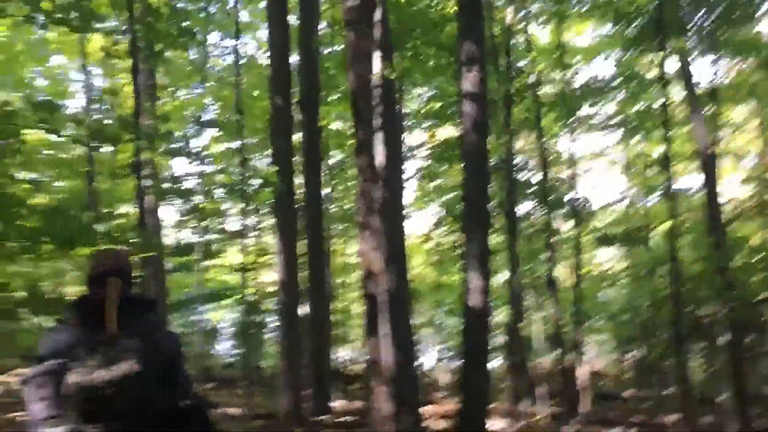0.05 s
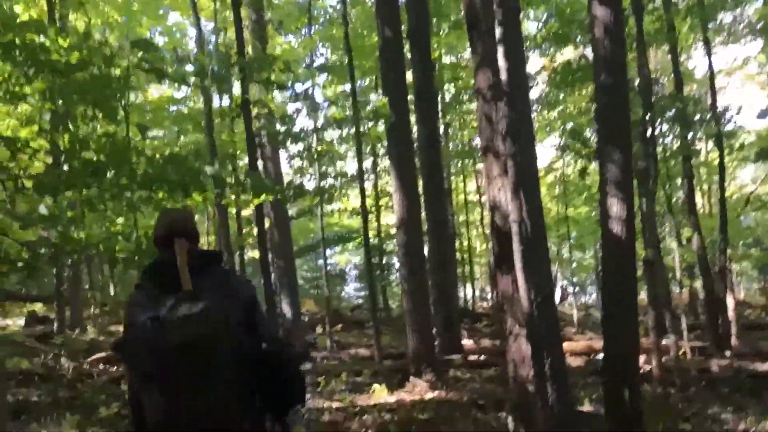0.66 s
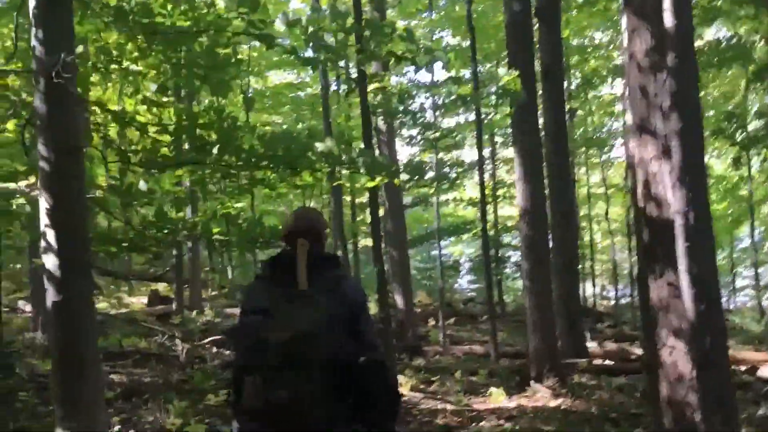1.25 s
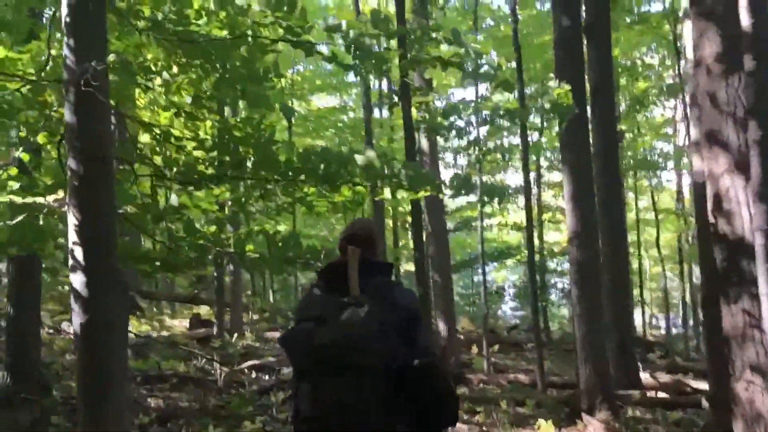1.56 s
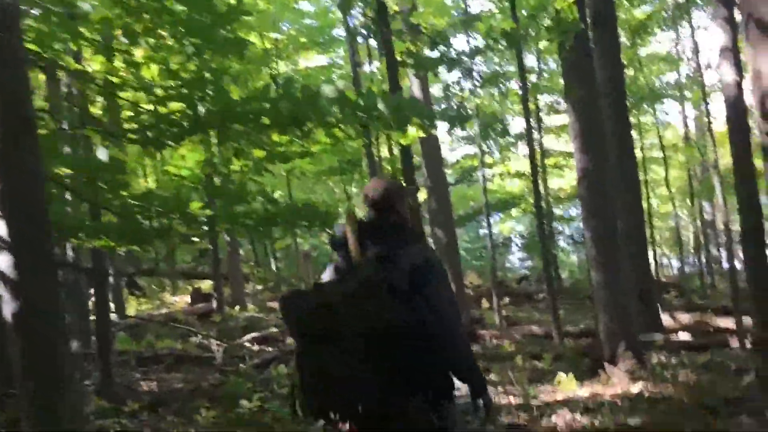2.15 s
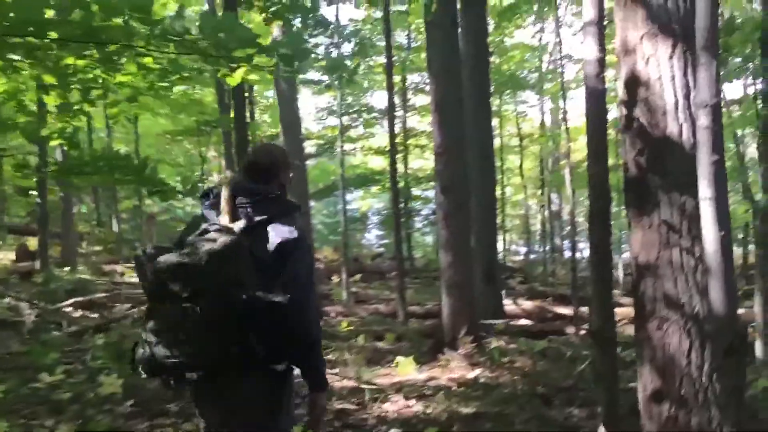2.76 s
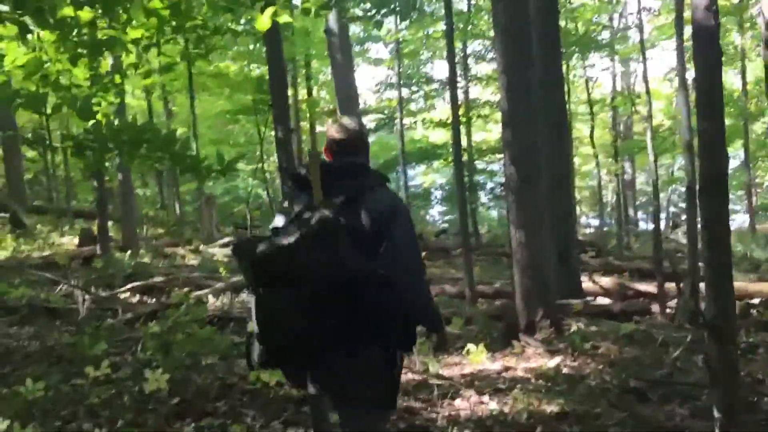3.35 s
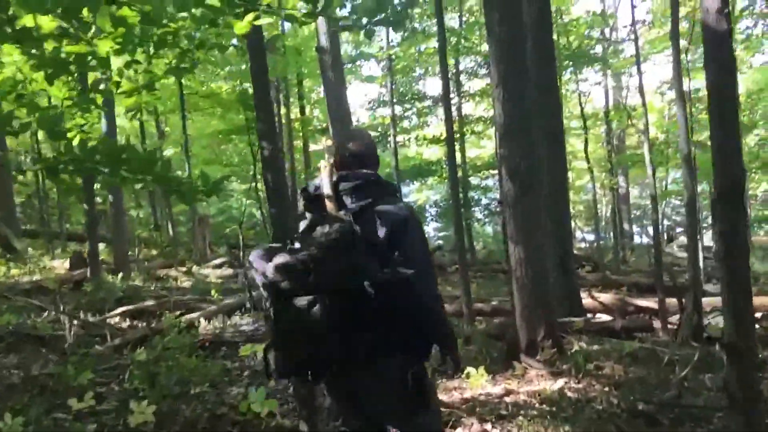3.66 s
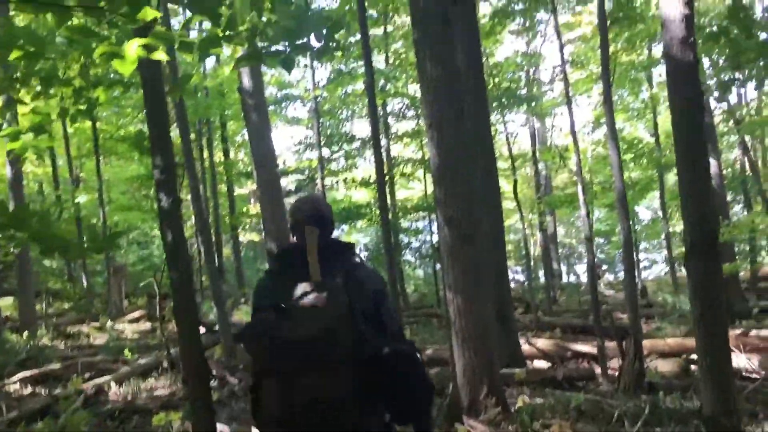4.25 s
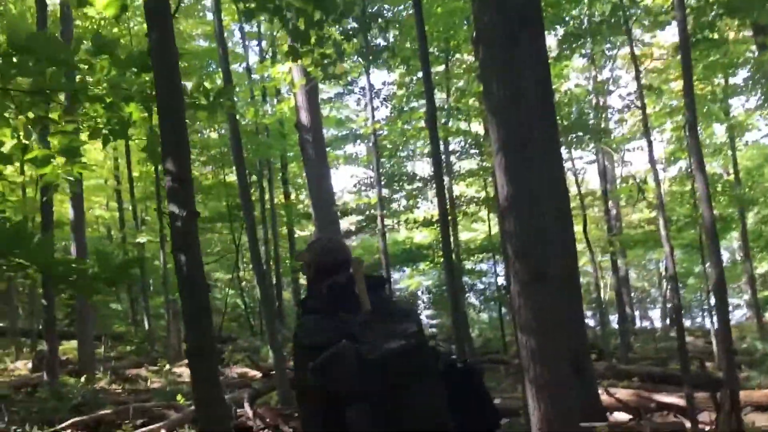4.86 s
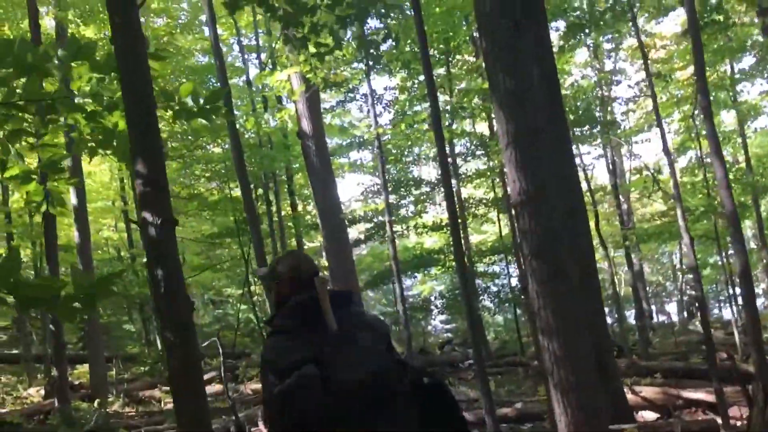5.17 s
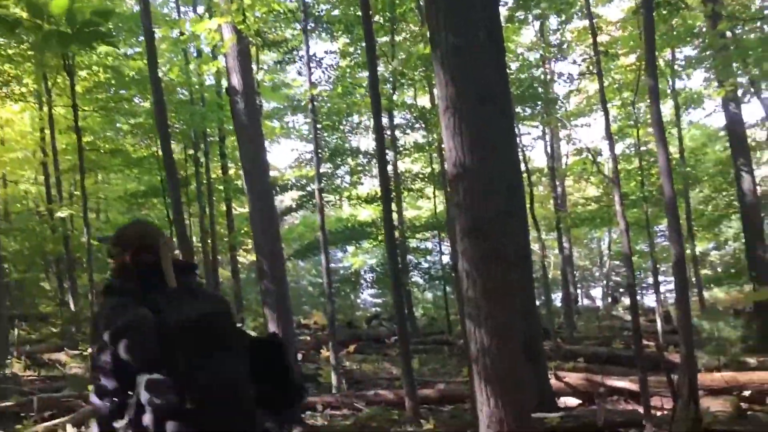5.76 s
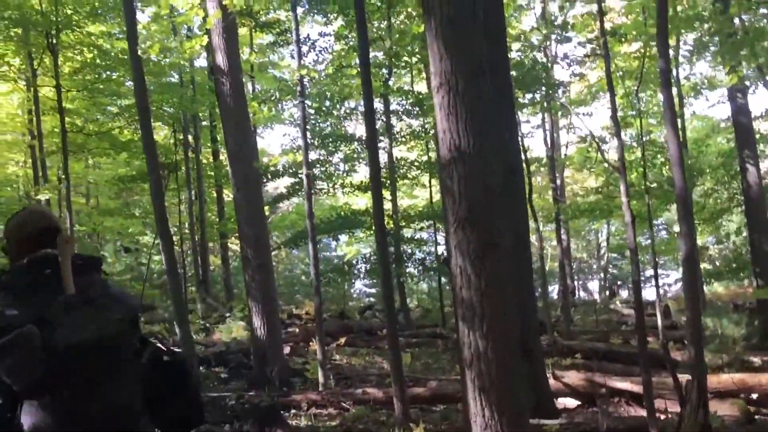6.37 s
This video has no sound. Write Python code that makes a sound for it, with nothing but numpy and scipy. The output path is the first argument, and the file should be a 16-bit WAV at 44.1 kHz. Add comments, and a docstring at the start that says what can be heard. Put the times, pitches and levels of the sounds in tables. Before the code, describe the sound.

Close footsteps crush brittle leaves on soft forest ground at a steady but slightly uneven walking pace. Small twigs tick and break under the boots, and thicker sticks give sharp cracks with a hollow knock. An early snap stands out, a louder run of snaps comes past the middle, and a few more land with heavy steps near the end. Underneath lies only a faint hush of woodland air.

```python
"""Dry leaf litter crunches under the boots of hikers walking through a wood.
Each step crushes a crowd of brittle leaves, whose tiny breaks ring as a crackle, and presses the
soft soil into a dull thump. Twigs snap underfoot with a crack, a tick, a knock and a thud.
The ground and the trunks scatter each snap into a short, thin tail. A faint hush lies beneath."""
import sys
import numpy as np
from scipy import signal
from scipy.fft import rfft, irfft
from scipy.io import wavfile
from scipy.ndimage import uniform_filter1d

SR = 44100
rng = np.random.default_rng(int(sys.argv[2]) if len(sys.argv) > 2 else 0)


def materialize(psi):
    """Save the field psi as 16-bit PCM at rate SR to the path in sys.argv[1].

    A 1-D psi becomes a single channel; in a 2-D psi each row is a channel.
    """
    bounded = np.clip(np.atleast_2d(psi).T, -1, 1)
    quanta = np.round(bounded * 32767).astype(np.int16)
    wavfile.write(sys.argv[1], SR, quanta)


N = 282840
THUD_HZ = 274.62  # usual pitch of a twig's recoil into the soil


def leaves(crush_db, crisp_db, body_db=0.5, packed_db=-7.5, slide_db=5, swish_db=-1, stalk_db=-5):
    """Leaves break and slide under the boots; a harder crush breaks more, and now and then a stalk."""
    # body of the crunch (frequency [Hz], level [dB])
    body_spectrum = [(700, -17.5), (1300, -4.5), (2200, 1.5), (3000, 0), (4200, -1), (5600, -1), (7000, -7),
                     (9500, -36.5)]
    # sizzle of the crisp edges (frequency [Hz], level [dB])
    crisp_spectrum = [(4500, -14), (7000, -9.5), (8200, -2.5), (9400, -2), (10400, -7.5), (12500, -3.5),
                      (15600, -6.5)]
    # low mids of packed leaves (frequency [Hz], level [dB])
    packed_spectrum = [(220, -7.5), (420, -6), (700, -2), (1100, 1.5), (1500, -4.5), (2400, -21.5)]
    busy = amp(.5 * (crush_db + 47))  # scales the break rates: 1 at a crush of -47 dB
    clicks = fractures(11000 * busy, spread_db=1, clump_db=3, clump_s=.006)
    bursts = amp(stalk_db) * stalks(35 * busy)
    rings = leaf_rings(clicks)
    slide = amp(slide_db) * rng.standard_normal(N)
    crackle = shifting_leaves(rings + slide + bursts)
    swish = amp(swish_db) * rng.standard_normal(N)  # thin edges brushing past each other
    body = amp(crush_db + body_db) * steady(colour(crackle, body_spectrum))
    edges = amp(crisp_db) * steady(colour(crackle + swish, crisp_spectrum))
    packed = amp(crush_db + packed_db) * steady(colour(crackle, packed_spectrum))
    return body + edges + packed


def boot_strokes(hold_s=0.018555, stir_db=-65.5, stir_crisp_db=-8):
    """Envelopes in dB of the crush and its crisp edges; loose litter keeps stirring between steps."""
    # a boot landing on the leaves or sweeping through them
    # (start [s], rise [s], time to fade by 20 dB [s], crush [dB], edges relative to crush [dB])
    strokes = [(0.0, 0.001667, 0.2549, -43, -4.5), (0.108, 0.02083, 0.2185, -48, -10.5),
               (0.18, 0.06423, 0.2512, -53.5, -12.5), (0.575, .055, 0.6731, -50, 0),
               (0.68, 0.15104, 0.3495, -42.5, -13.5), (0.839, 0.14533, 0.0961, -36.5, -5.5),
               (1.06, 0.1751, 0.3989, -57, -13), (1.27, 0.01961, 0.4784, -52, 1.5),
               (1.33, 0.1219, 1.0481, -48.5, -4.5), (1.45, 0.08417, 0.4016, -43.5, -2),
               (1.709, 0.07805, 0.1576, -41, -4.5), (1.999, 0.03985, 0.1838, -48, -2),
               (2.13, 0.02654, 0.2031, -53.5, -3), (2.2, 0.12049, 0.0019, -46.5, -4.5),
               (2.339, 0.0118, 0.256, -36.5, -3.5), (2.607, 0.03405, 0.1042, -44.5, -0.5),
               (2.68, 0.08343, 0.2774, -43, -1.5), (2.901, 0.05456, 0.0006, -47, -1.5),
               (3.08, 0.03366, 0.58, -51, -7.5), (3.14, 0.07602, 0.2966, -43, -4.5),
               (3.42, 0.01942, 0.2009, -43.5, -1), (3.53, 0.06092, 0.5954, -51, -2),
               (3.719, 0.0325, 0.2116, -39, -5.5), (3.82, 0.03338, 0.2084, -39, -3),
               (4.25, 0.01483, 2.0967, -56.5, -3), (4.329, 0.02464, 0.822, -44, -2.5),
               (4.48, 0.02542, 0.3392, -43.5, -2), (4.65, 0.0891, 0.1769, -43, -3.5),
               (4.92, 0.01298, 0.1764, -47, -3), (5.002, 0.05133, 0.331, -41.5, -2.5),
               (5.185, 0.01558, 0.2139, -44, 2.5), (5.28, 0.05705, 0.3238, -42, -4),
               (5.519, 0.04508, 0.1116, -45.5, -0.5), (5.63, 0.1603, 0.1219, -43.5, -1.5),
               (5.79, 0.10823, 0.216, -35.5, -4), (6.06, 0.01674, 0.0854, -39, -4)]
    crush = np.full(N, amp(stir_db) ** 2)
    crisp = np.full(N, amp(stir_db + stir_crisp_db) ** 2)
    for start, rise_s, fade_s, crush_db, crisp_db in strokes:
        power = amp(crush_db) ** 2 * press(rise_s, hold_s, fade_s)
        add(crush, start, power)
        add(crisp, start, amp(crisp_db) ** 2 * power)
    return 10 * np.log10(crush), 10 * np.log10(crisp)


def press(rise_s, hold_s, fade_s, curve=1.1615):
    """Power of one push of a boot: it builds, holds, then dies away by 20 dB in each fade_s."""
    t = np.arange(0, rise_s + hold_s + 2 * fade_s, 1 / SR)
    attack = np.sin(np.pi / 2 * np.minimum(t / rise_s, 1)) ** curve
    release = amp(-20 * np.maximum(t - rise_s - hold_s, 0) / fade_s)
    return (attack * release) ** 2


def fractures(per_s, spread_db, clump_db, clump_s):
    """Tiny breaks of random sign: many small, a few larger, swelling in clumps as something gives way."""
    size = amp(spread_db * np.minimum(rng.exponential(1, N), 4)) * rng.choice([-1, 1], N)
    knots = np.arange(0, N, max(clump_s * SR, 20))
    clumps = np.interp(np.arange(N), knots, rng.standard_normal(N)[:len(knots)])
    breaks = rng.random(N) < per_s / SR
    return evened(size * breaks * amp(clump_db * np.clip(clumps, -2, 2)))


def leaf_rings(clicks, width_hz=282.44, count=48):
    """Each break briefly rings one of many leaves, each at its own pitch; large, low ones ring louder."""
    leaf = rng.integers(0, count, N // 8 + 1).repeat(8)[:N]
    pitches = np.linspace(np.sqrt(500), np.sqrt(15700), count) ** 2
    widths = width_hz * np.sqrt(pitches / pitches.mean())
    gains = 1 / np.hypot(1, pitches / 2600)
    rings = (gains[k] * ring(clicks * (leaf == k), hz, hz / widths[k]) for k, hz in enumerate(pitches))
    return evened(sum(rings))


def stalks(per_s, decay_s=0.000478):
    """Each breaking stalk spits a short burst of noise."""
    breaks = fractures(per_s, spread_db=-1, clump_db=-5, clump_s=0.048)
    power = signal.lfilter([1], [1, -np.exp(-1 / (decay_s * SR))], breaks ** 2 + 1e-20)
    return evened(np.sqrt(power) * rng.standard_normal(N))


def shifting_leaves(x, depth_db=2, patch_s=.07, patch_hz=260, size=512):
    """The boot meets ever different leaves, so their resonances come and go."""
    spectra = signal.stft(x, nperseg=size)[2]
    patches = uniform_filter1d(rng.standard_normal(spectra.shape), round(patch_hz * size / SR), axis=0)
    patches = uniform_filter1d(patches, round(patch_s * SR / size), axis=1)
    return signal.istft(spectra * amp(depth_db * evened(patches)), nperseg=size)[1][:N]


def twigs(usual_thud_db=-33.5, db_per_octave=31.5):
    """The featured snaps, each with its own echoes; a harder recoil moves more soil and thuds lower."""
    # breaking twigs (time [s], crack [dB], wood pitch [Hz], splinter tick [dB], knock [dB], thud [dB])
    snaps = [(0.0116, -37.5, 1910, -53.5, -34, -42.5), (0.0207, -33, 1718, -50.5, -26.5, -38.5),
             (0.2307, -48, 2198, -66, -42, -62.5), (0.7738, -33.5, 2206, -52, -39.5, -44),
             (0.786, -34.5, 2601, -38.5, -35.5, -36.5), (0.8063, -15, 2388, -26, -23, -25.5),
             (0.8196, -22.5, 2635, -29.5, -53, -36), (0.8656, -27, 2727, -35, -29, -43.5),
             (0.8739, -32.5, 2211, -34.5, -36.5, -34.5), (0.99, -40, 3003, -36, -49, -46),
             (1.3854, -43, 3053, -42.5, -49, -49), (1.572, -22.5, 4475, -36.5, -50.5, -31.5),
             (1.777, -58, 2900, -57, -36.5, -35.5), (2.396, -28.5, 3652, -24, -44, -29.5),
             (2.654, -37, 2546, -55, -67, -50.5), (2.797, -28, 3300, -34.5, -48, -32),
             (2.8758, -33.5, 4313, -34.5, -60, -41.5), (3.3386, -39, 2375, -43.5, -53.5, -70.5),
             (3.4396, -30.5, 3587, -30.5, -47.5, -38), (3.7259, -38.5, 4256, -40, -48, -57),
             (3.7628, -30, 2668, -36.5, -38, -41.5), (3.766, -29, 2804, -37, -29, -37.5),
             (3.838, -31, 3196, -29, -37.5, -37.5), (3.985, -42, 2415, -54, -38, -55),
             (4.0663, -34.5, 6131, -32.5, -78.5, -57.5), (4.1389, -48.5, 4212, -44, -58, -66),
             (4.3469, -9.5, 5100, -19.5, -25, -18), (4.3553, -21.5, 3586, -40, -44.5, -28.5),
             (4.3873, -33, 4486, -36, -49.5, -47.5), (4.483, -18, 2586, -18.5, -20, -37),
             (4.4899, -25, 3956, -23.5, -44, -46), (4.5018, -23, 4652, -16.5, -42.5, -40.5),
             (4.5083, -15, 4800, -18.5, -24.5, -39.5), (4.6783, -26, 3672, -30.5, -34.5, -28),
             (4.7063, -31, 3643, -32, -38, -33), (4.7309, -35.5, 3606, -35.5, -37, -38.5),
             (4.7641, -29.5, 2133, -40, -26.5, -33), (4.931, -26.5, 5741, -24, -48.5, -46.5),
             (5.3266, -43.5, 3600, -36.5, -45.5, -50.5), (5.8279, -30.5, 2505, -34.5, -33.5, -39.5),
             (5.887, -27.5, 3286, -29, -25, -60.5), (5.891, -21, 5265, -34, -27.5, -56.5),
             (5.9143, -29, 2812, -25, -34, -49.5), (6.0702, -18.5, 2500, -20, -26.5, -35),
             (6.0791, -26.5, 2800, -30.5, -54.5, -37), (6.1877, -27.5, 1817, -34.5, -32.5, -46.5),
             (6.2706, -45.5, 3006, -69.5, -64, -72.5), (6.3116, -36, 2942, -36.5, -39.5, -50)]
    out = np.zeros(N)
    for s, crack_db, wood_hz, tick_db, knock_db, thud_db in snaps:
        thud_hz = THUD_HZ * 2 ** ((usual_thud_db - thud_db) / db_per_octave)
        snap = twig(crack_db, wood_hz, tick_db, knock_db, thud_db, thud_hz)
        add(out, s - .0003, scatter(snap, near_db=-6, far_db=-13.5))
    return out


def twig(crack_db, wood_hz, tick_db, knock_db, thud_db, thud_hz, ring_db=-2, blow_s=.003, size=1200):
    """Fibres tear in about a millisecond; the stick rings, and its recoil thumps the soil."""
    # crack of the wood (frequency [multiple of wood pitch], level [dB])
    crack_spectrum = [(.28, -19), (.5, -3.5), (.85, -3), (1.25, -6), (1.7, -9), (2.6, -17)]
    # bright tick of a splinter (frequency [Hz], level [dB])
    tick_spectrum = [(4500, -26), (6800, -2), (9200, 2.5), (10500, -3.5), (13000, -1.5), (15800, -3)]
    # hollow knock of the stick (frequency [Hz], level [dB])
    knock_spectrum = [(200, -17), (420, -5.5), (650, 0.5), (950, 0.5), (1300, -0.5), (1700, -4),
                      (3000, -36.5)]
    t = np.arange(size) / SR
    fibres = rfft(rng.standard_normal(size) * (1 - np.exp(-t / .0001)) * np.exp(-t / .0011))
    tear = irfft(fibres / np.cbrt(abs(fibres))) * np.exp(-t / .006)  # excites all pitches nearly alike
    crack = colour(tear, [(multiple * wood_hz, db) for multiple, db in crack_spectrum])
    crack = crack + amp(ring_db) * ring(crack, wood_hz, q=4.325)
    tick = colour(tear, tick_spectrum)
    knock = colour(tear, knock_spectrum)
    thud = ring(ring(signal.unit_impulse(size), thud_hz, q=2.0585), thud_hz, q=1)
    parts = [(crack_db, crack), (tick_db, tick), (knock_db, knock), (thud_db, thud)]
    # levels are rms as if all the energy fell within blow_s
    return sum(amp(db) * evened(part) for db, part in parts) * np.sqrt(blow_s * SR / size)


def sprigs(crush_db, per_s=14, over_db=1.5, spread_db=3, low_hz=2800, high_hz=5631, count=150):
    """Thin twigs give way at random moments, their level following the crush of the boot."""
    out = np.zeros(N)
    for when, chance, size, pitch in rng.random((count, 4)):
        if chance < per_s * N / SR / count:
            db = crush_db[int(when * N)] + over_db + spread_db * (2 * size - 1)
            wood_hz = low_hz + pitch * (high_hz - low_hz)
            snap = twig(db, wood_hz, tick_db=db - 1, knock_db=db - 9, thud_db=db - 13, thud_hz=THUD_HZ)
            add(out, when * N / SR, snap)
    return scatter(out, near_db=-14.5, far_db=-24)[:N]


def soil(crush_db, share_db=-16.5):
    """The soft ground gives way in small dull lurches, most when a heel or sole takes the weight."""
    # a heel or sole loading the soil (time [s], level [dB])
    thumps = [(0.0, -49), (0.19, -54.5), (0.77, -45.5), (0.81, -51), (0.875, -44.5), (0.97, -52),
              (1.405, -52), (1.53, -48.5), (1.575, -48.5), (1.755, -44), (2.085, -59.5), (2.18, -57),
              (2.289, -45.5), (2.345, -51), (2.39, -46.5), (2.629, -52), (3.12, -59.5), (3.225, -63.5),
              (3.429, -46.5), (3.48, -49.5), (3.679, -48.5), (3.735, -40.5), (3.885, -54.5), (4.5, -49),
              (4.675, -44.5), (5.019, -48.5), (5.3, -60.5), (5.592, -54.5), (5.803, -44.5), (5.865, -40.5),
              (5.914, -43.5), (5.983, -46), (6.068, -45)]
    # low end of soft earth (frequency [Hz], level [dB])
    soil_spectrum = [(25, -41), (50, -9), (90, 1.5), (180, 2.5), (300, -0.5), (450, -5.5), (900, -34.5)]
    lurches = fractures(900, spread_db=1, clump_db=1, clump_s=0.015)
    load = amp(crush_db + share_db) ** 2  # part of the crush reaches the soil
    for s, db in thumps:
        add(load, s, amp(db) ** 2 * press(rise_s=0.005917, hold_s=0.01695, fade_s=0.04545))
    return np.sqrt(load) * steady(colour(lurches, soil_spectrum))


def scatter(x, near_db, far_db, near_s=0.010191, bass_hz=330, absorb_hz=10000, size=24000):
    """Close echoes from ground and legs, then a thin tail from the trunks."""
    # decay among the trunks (frequency [Hz], time to fade by 60 dB [s])
    wood_t60 = [(150, 0.273), (700, 0.2122), (2500, 0.2684), (5500, 0.4454), (9500, 0.3991),
                (16000, 0.1651)]
    t = np.arange(size) / SR
    near = rng.standard_normal(size) * (rng.random(size) < .15) * np.exp(-t / near_s) * (t > .002)
    hz, frame_s, spectra = signal.stft(rng.standard_normal(size), SR, nperseg=256)
    decay = amp(-60 * frame_s / read(wood_t60, hz)[:, None])
    far = signal.istft(spectra * decay, SR, nperseg=256)[1][:size] * (t > .008)
    echoes = (amp(near_db) * evened(near) + amp(far_db) * evened(far)) / np.sqrt(size)
    # bass bends round the trunks and the litter soaks up treble
    echoes = signal.lfilter(*signal.butter(1, [bass_hz, absorb_hz], "bandpass", fs=SR), echoes)
    return signal.fftconvolve(x, echoes + signal.unit_impulse(size))


def air(level_db=-60):
    """Faint steady hush of the wood."""
    # bed of woodland air (frequency [Hz], level [dB])
    air_spectrum = [(25, -27.5), (55, -7), (110, -3.5), (180, -3), (280, -8.5), (450, -10), (900, -14),
                    (2400, -11), (4500, -20), (7500, -44.5), (10500, -29), (15500, -36.5)]
    return amp(level_db) * evened(colour(rng.standard_normal(N), air_spectrum))


def colour(x, points, size=4096):
    """Causal filter with the given spectrum, falling 24 dB an octave beyond its ends."""
    hz = np.maximum(abs(np.fft.fftfreq(size, 1 / SR)), 5)
    octaves_outside = abs(np.log2(hz / np.clip(hz, points[0][0], points[-1][0])))
    log_gain = np.log(amp(np.maximum(read(points, hz) - 24 * octaves_outside, -90)))
    taps = np.fft.ifft(np.exp(np.conj(signal.hilbert(log_gain)))).real[:size // 2]  # minimum phase
    return signal.fftconvolve(x, taps)[:len(x)]


def ring(x, hz, q):
    """One damped resonance."""
    return signal.lfilter(*signal.iirpeak(min(hz, SR / 2.5), max(q, 1), fs=SR), x)


def steady(x, size=3000):
    """Evens out the slow level of a crackle and keeps its fine grain."""
    return x / np.sqrt(abs(uniform_filter1d(x ** 2, size)) + 1e-9)


def evened(x):
    """Scales to rms 1."""
    return x / np.sqrt(np.mean(x ** 2) + 1e-20)


def amp(db):
    """Decibels to gain."""
    return 10 ** (np.asarray(db) / 20)


def read(points, hz):
    """Reads a curve on a log-frequency axis."""
    f, value = np.transpose(points)
    return np.interp(np.log(hz + 1), np.log(f + 1), value)


def add(mix, s, sound):
    """Mixes a sound in at s seconds."""
    part = mix[max(round(s * SR), 0):][:len(sound)]
    part += sound[:len(part)]


def scene():
    """Leaves, soil and twigs underfoot, over the hush of the wood, in mono."""
    crush_db, crisp_db = boot_strokes()
    return (leaves(crush_db, crisp_db) + soil(crush_db) + sprigs(crush_db) + twigs() + air())[None]


def record(dry, edge_hz=15800):
    """Clips any peak beyond full scale, then cuts the highest treble."""
    lowpass = signal.firwin(255, edge_hz, window=("kaiser", 8), fs=SR)
    return signal.oaconvolve(np.clip(dry, -1, 1), lowpass[None], "same")


dry = scene()
out = record(dry)
materialize(out)
```